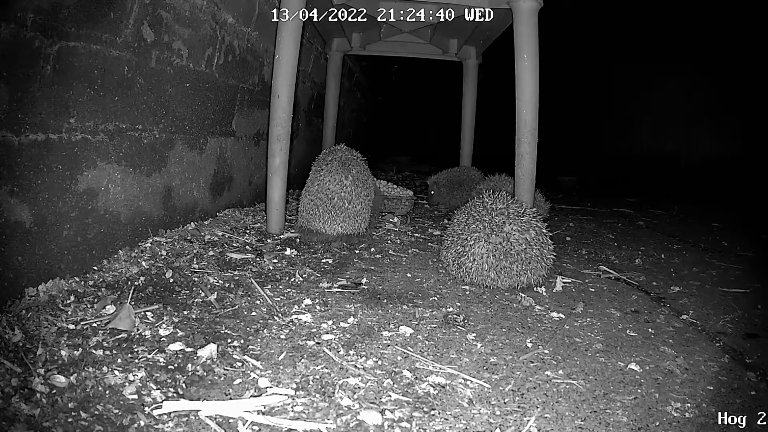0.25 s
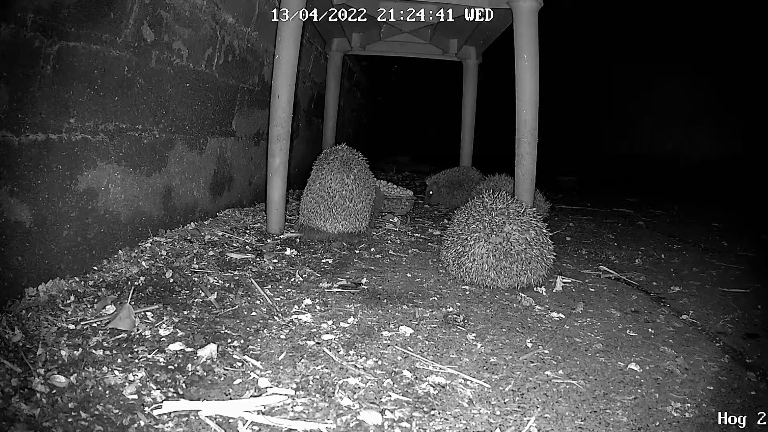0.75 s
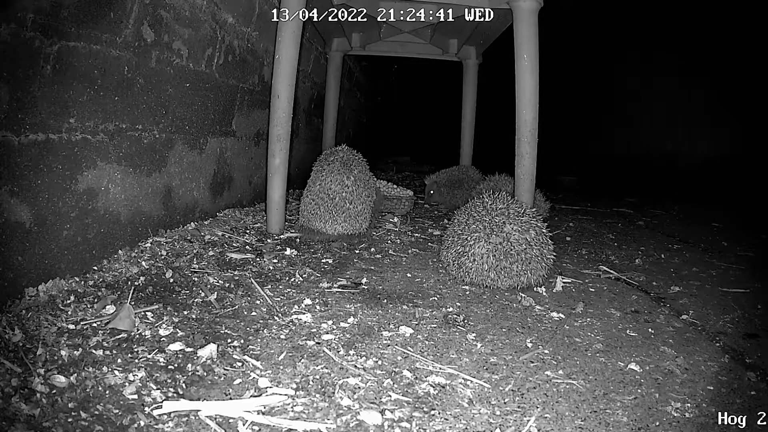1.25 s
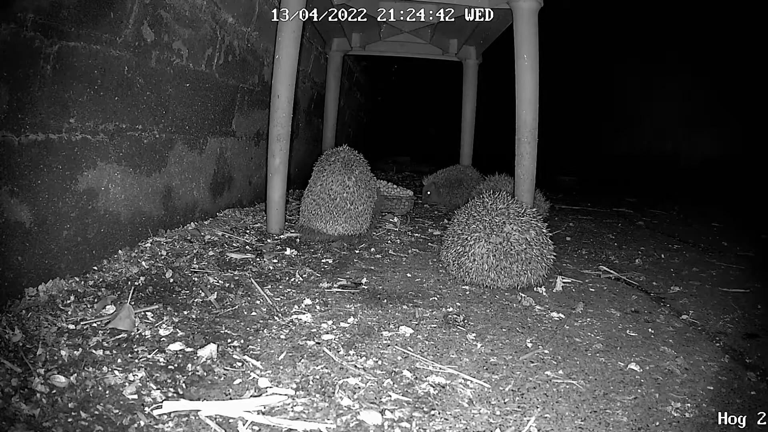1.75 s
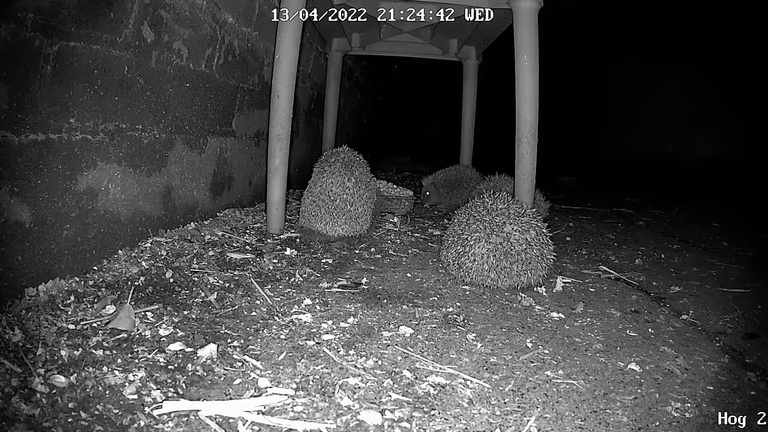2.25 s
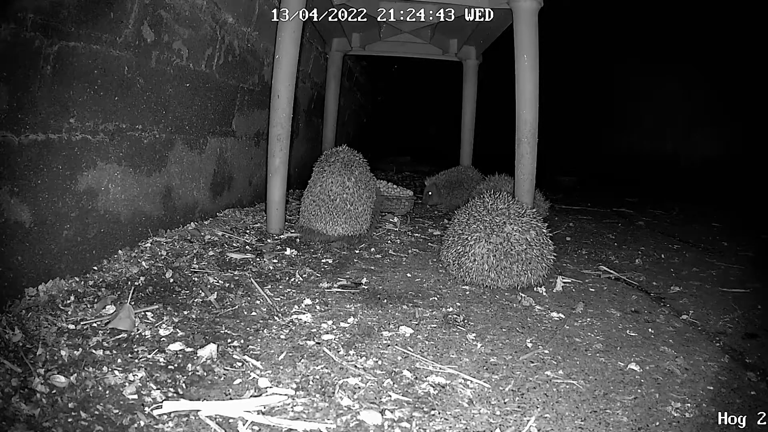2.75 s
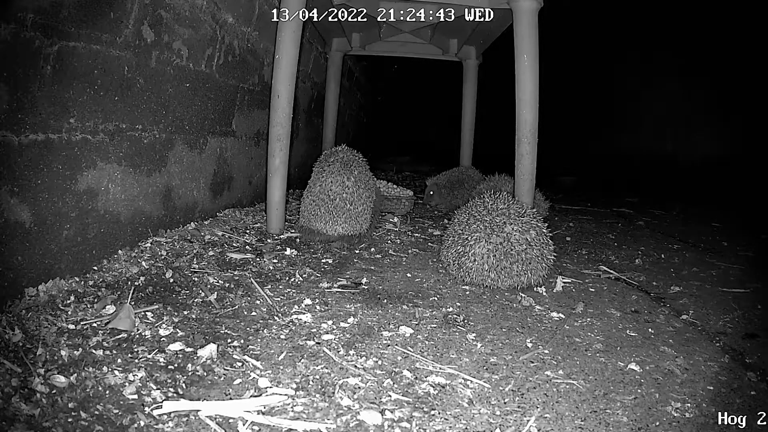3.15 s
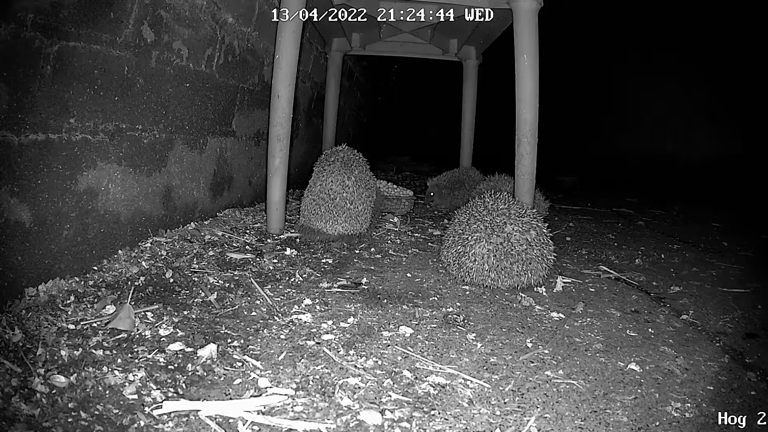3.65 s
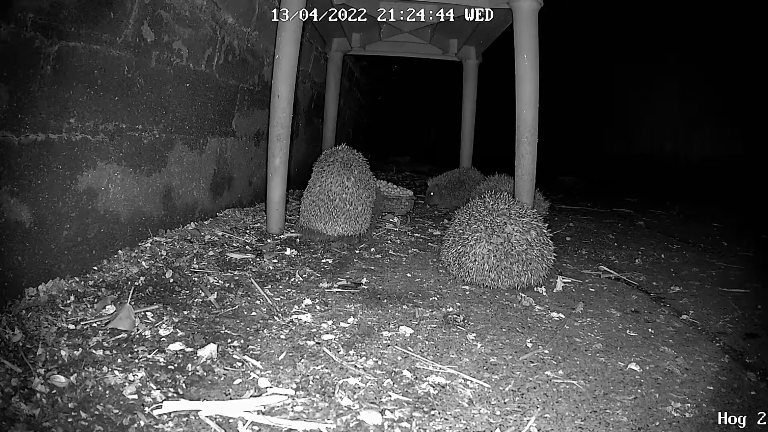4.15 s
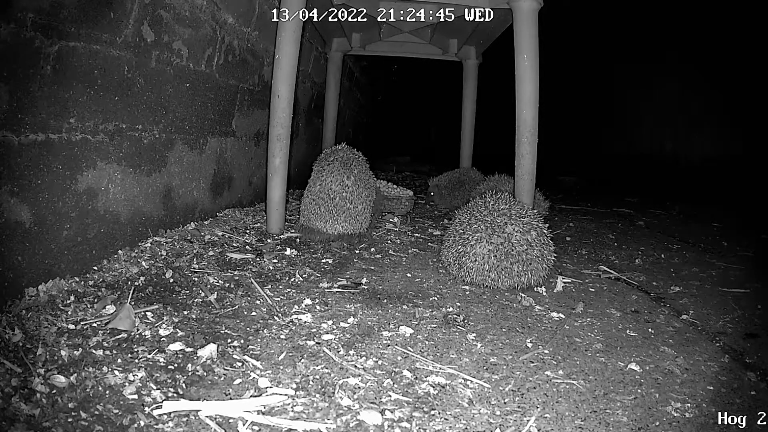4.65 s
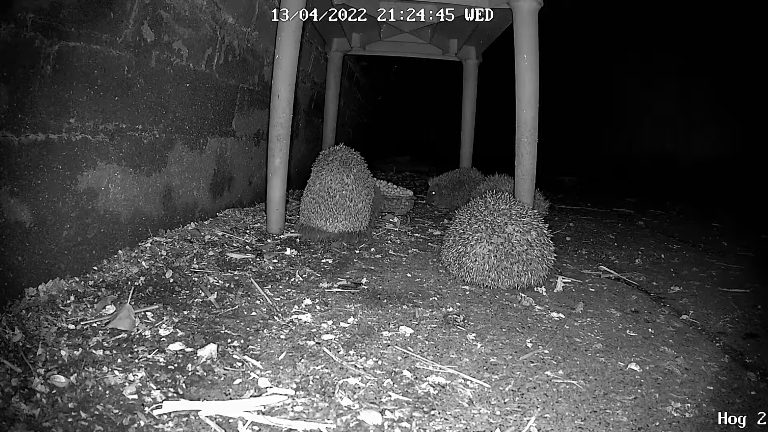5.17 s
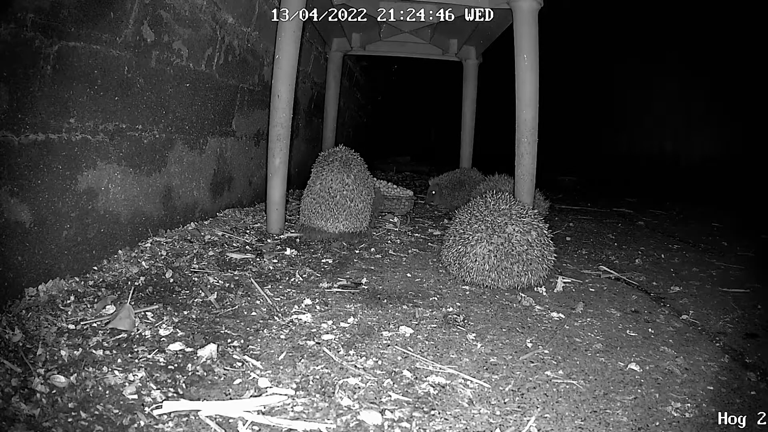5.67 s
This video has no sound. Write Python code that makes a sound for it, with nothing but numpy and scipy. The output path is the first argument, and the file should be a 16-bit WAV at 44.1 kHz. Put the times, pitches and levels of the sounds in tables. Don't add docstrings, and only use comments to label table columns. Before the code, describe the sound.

Irregular hard crunches, crumbly chewing and small dish clinks close to a sheltered feeding spot, with a low unsteady mutter behind.

```python
import sys
import numpy as np
from scipy import signal
from scipy.fft import rfft, irfft, next_fast_len
from scipy.io import wavfile
from scipy.ndimage import uniform_filter1d, minimum_filter1d, map_coordinates

SR = 44100
rng = np.random.default_rng(int(sys.argv[2]) if len(sys.argv) > 2 else 0)


def store_pcm(level_fs):
    pcm = np.round(np.clip(level_fs, -1, 1) * 32767).astype(np.int16)
    wavfile.write(sys.argv[1], SR, np.atleast_2d(pcm).T)


def ratio_of_db(decibels):
    return 10 ** (np.asarray(decibels, float) / 20)


N = 260631
TIME_S = np.arange(N) / SR

# frequency in Hz, level in dB per Hz.
NIGHT_SPECTRUM = [(8.8, -29.5), (15, 0), (63, -3), (114, -9.5), (264, -18), (411, -23.5), (674, -25.5),
                  (748, -27), (830, -23), (2180, -42), (2750, -43.5), (5860, -49), (7600, -46.5),
                  (9880, -88), (16700, -120)]
# start in seconds, end in seconds, share of time high (0-1).
PREAMP_BURSTS = [(0, 1.038, .45), (1.907, 1.915, 1), (1.988, 2.003, 1), (2.005, 3.435, .45),
                 (3.577, 3.716, .4), (3.996, 4.005, 1), (4.009, 4.183, .35), (4.233, 4.237, 1),
                 (4.25, 4.272, .5), (4.294, 4.299, 1), (4.353, 4.362, 1), (4.409, 4.412, 1),
                 (4.49, 4.497, 1), (4.551, 4.554, 1), (4.614, 4.627, 1), (4.683, 4.693, 1),
                 (4.696, 4.702, 1)]
# time in seconds, level in dB.
SHUFFLE_LEVEL = [
    (5.81, -84.5),
    (5.85, -62),
    (5.875, -51),
    (5.91, -61),
]
# frequency in Hz, level in dB per Hz.
LITTER_SPECTRUM = [(240, -54.5), (400, -12), (825, 2), (1680, -5), (2170, -29.5), (2310, -8.5), (5870, -14),
                   (7500, -28), (9750, -76), (16500, -120)]
# time in seconds, pitch in Hz, level in dB.
SQUEAK_PATH = [
    (3.45, 5960, -70.5),
    (3.562, 6000, -71.5),
    (3.574, 6000, -83),
    (3.578, 6000, -96),
    (3.585, 6187, -88),
]
# middle in seconds, half length in seconds, level in dB.
SCRAPES = [
    (1.028, 0.024, -73),
    (1.9, 0.073, -66.5),
    (2.47, 0.046, -70),
    (5.872, .045, -65.5),
]
# middle in seconds, half length in seconds, level in dB.
CHEWS = [(.13, 0.065, -73), (0.24, 0.065, -73.5), (0.433, 0.037, -74), (0.668, 0.034, -75),
         (1.015, 0.023, -65.5), (1.268, 0.02, -69), (1.402, 0.076, -68.5), (1.727, 0.011, -67.5),
         (1.864, 0.029, -74), (1.909, 0.042, -63), (2.098, 0.043, -71), (2.193, 0.04, -62),
         (2.458, 0.029, -62), (2.568, 0.047, -69.5), (2.763, 0.043, -64), (2.802, 0.036, -65),
         (3.045, 0.019, -58.5), (3.104, 0.026, -69.5), (3.37, 0.087, -70), (3.639, 0.063, -70),
         (3.916, 0.041, -71), (4.065, 0.028, -75), (4.167, 0.033, -71.5), (4.257, 0.034, -68.5),
         (4.358, 0.037, -75.5), (4.814, 0.017, -68.5), (5.284, 0.016, -63.5), (5.565, 0.045, -73.5),
         (5.675, 0.013, -63)]
# time in seconds, peak in dB, tilt in dB per body, jaw share in dB.
SPLITS = [(.742, -28.5, 0.5, -9), (0.7514, -30.5, -2.5, -9), (.829, -28, -3, -24), (.8342, -38.5, -1.5, -6),
          (0.8477, -46.5, 1, -4), (0.9933, -42, 1.5, -13), (1.0847, -36.5, -2.5, 2), (1.1596, -25.5, 0, -9),
          (1.166, -22, 4, -31), (1.3567, -40, -0.5, -5), (1.3812, -36, 4, -1.5), (1.4118, -42.5, 4.5, -4.5),
          (1.5695, -18, 0, -15), (1.5765, -26.5, -0.5, 0), (1.7749, -33, 0.5, 2), (1.781, -34, 2, -8),
          (1.8418, -36, 1, -10), (1.9043, -37.5, 3.5, -3), (2.1013, -43.5, -4, -1),
          (2.183, -35, -1.5, -9.5), (2.5279, -32.5, -3.5, 7), (2.555, -43, -1.5, -4), (3.046, -43, -5.5, 6),
          (5.7424, -26, 3.5, -12.5), (5.8707, -25, 6, -14)]
# time in seconds, peak in dB, tilt in dB per body.
MOLAR_CRACKS = [(.1848, -48, -1), (.2074, -50.5, 7), (.2334, -33, -1.5), (.6475, -49, -4),
                (.6652, -49, 1.5), (1.0069, -35.5, 1), (1.339, -48, 3), (1.3509, -33, 0),
                (1.7222, -48.5, -3), (1.834, -28.5, -1), (2.1275, -40.5, 1), (2.1777, -44, -1),
                (2.4518, -47, -5), (2.456, -48, 0), (2.469, -45, 1), (2.4739, -41.5, -6), (2.4803, -34, -1),
                (2.7565, -46, -1), (2.761, -37, 1), (2.7662, -41, 0), (3.0274, -36.5, 1), (3.0663, -50, -5),
                (3.3311, -38, -3), (3.3507, -45, -4), (3.3726, -42, 5.5), (3.898, -41.5, -5),
                (4.251, -42.5, -3), (5.276, -44, 3), (5.2932, -44, -4), (5.6718, -44.5, -1)]
# time in seconds, peak in dB, tilt in dB per body.
DISH_NUDGES = [(.169, -44, 0.5), (.2598, -49, 4.5), (.4294, -53, -4), (1.925, -37, 5), (2.1501, -34, 2),
               (2.2082, -50, -6), (2.2415, -55, -4), (2.5337, -44, 0), (2.5632, -46.5, -4),
               (2.7995, -48, -1), (2.8505, -44.5, -2.5), (3.4561, -41.5, -5.5), (3.623, -38, 2),
               (3.6275, -33.5, 2), (3.6389, -56, 3), (3.6552, -54, 1), (3.6778, -51, 6), (3.726, -53, -10),
               (3.9224, -33, -2), (3.9348, -41.5, -0.5), (3.9807, -54.5, -7), (4.2718, -47, 1),
               (4.3337, -52, 5), (4.8232, -57, 3), (4.8524, -44, -0.5), (5.2871, -45, 0), (5.503, -52.5, 4),
               (5.532, -58, 4)]
# time in seconds, peak in dB, tilt in dB per body.
TOOTH_CLACKS = [
    (.4575, -50.5, 0),
    (.749, -32.5, 2),
    (1.898, -50, 5),
    (5.7735, -42.5, 1.5),
]
SPLIT_SHARE_DB = (-8, -7.5, -7)
# centre in Hz, width in Hz, level in dB.
SNAP_BANDS = [(1700, 2100, 0), (2950, 1500, 1), (4450, 1500, 1), (6100, 2200, -1)]
# centre in Hz, width in Hz, level in dB.
DISH_MODES = [(830, 250, -5), (1150, 250, -4), (1600, 300, -5), (1900, 350, 0), (2300, 300, 0)]
# centre in Hz, width in Hz, level in dB.
RIM_MODES = [(2830, 300, 0), (3230, 250, -4), (3550, 250, -5)]
# centre in Hz, width in Hz, level in dB.
JAW_MODES = [(4200, 350, -2), (4500, 400, 0), (4850, 350, -4)]
# centre in Hz, width in Hz, level in dB.
TOOTH_MODES = [(5680, 450, -1), (6340, 450, 0), (6750, 350, -3)]
# frequency in Hz, t60 in seconds.
SHELTER_T60 = [(800, 0.46), (2600, 0.12), (7000, 0.16)]
# start in seconds, end in seconds, share muted (0-1).
LEAN_STRETCHES = [(.01, 0.063, .4), (0.319, 0.37, .7), (.525, 0.618, .45), (.86, 1.14, .08),
                  (1.996, 2.02, .4), (3.47, 3.596, .25), (3.71, 3.772, 0.35), (4.424, 4.534, .7),
                  (4.61, 4.732, .45), (4.734, 4.78, 0.89), (5.686, 5.739, 1), (5.77, 5.86, .25)]
# frequency in Hz, gain in dB.
CAMERA_BAND = [(8, -22), (20, -2.5), (6600, 0), (7000, -5.5), (7400, -11), (7800, -22), (8200, -50.5),
               (9000, -80)]


def unit(x):
    return x / np.sqrt(np.mean(x ** 2) + 1e-20)


def along(points, hz):
    f, v = np.transpose(points)
    return np.interp(np.log(hz + 1), np.log(f + 1), v)


def curves(rows):
    s, *cols = np.transpose(rows)
    return [np.interp(TIME_S, s, c) for c in cols]


def swells(rows):
    return sum(ratio_of_db(db) * np.exp(-((TIME_S - s) / half_s) ** 2) for s, half_s, db in rows)


def wobble(rate_hz):
    knots = rng.standard_normal(int(N * rate_hz / SR) + 4)
    return unit(map_coordinates(knots, [np.arange(N) * rate_hz / SR]))


def filtered(x, response):
    m = next_fast_len(N + SR // 2)
    return irfft(rfft(x, m) * response(np.fft.rfftfreq(m, 1 / SR)), m)[..., :N]


def ringing(modes):
    def response(f):
        total = 0
        for k, (centre_hz, width_hz, db) in enumerate(modes):
            damping = 1j * f * width_hz
            total = total + (-1) ** k * ratio_of_db(db) * damping / (centre_hz ** 2 - f * f + damping)
        return total
    return response


def coloured(spectrum):
    return unit(filtered(rng.standard_normal(N), lambda hz: ratio_of_db(along(spectrum, hz))))


def grains(rate_hz, spread_db):
    hit = rng.random(N) < rate_hz / SR
    sizes = ratio_of_db(spread_db * np.minimum(rng.exponential(size=N), 2.5)) * rng.choice([-1, 1], N)
    return unit(hit * sizes) + .5 * rng.standard_normal(N)


def night():
    return ratio_of_db(-54 + 0.16 * wobble(3.6)) * coloured(NIGHT_SPECTRUM)


def preamp_flicker():
    share_high = np.zeros(N)
    for start_s, end_s, high in PREAMP_BURSTS:
        share_high[(TIME_S >= start_s) & (TIME_S < end_s)] = high
    hop_times = np.cumsum(rng.gamma(3, 1 / 3, N // 50)) * SR / 210
    draw = hop_times.searchsorted(np.arange(N))
    state = rng.random(N // 50 + 1)[draw] < share_high
    sag_hz, round_hz = 22, 165
    shape = lambda hz: 1j * hz / (sag_hz + 1j * hz) / (1 + 1j * hz / round_hz) ** 2
    return ratio_of_db(-37.0) * filtered(state * 1., shape)


def preamp_busy():
    bridge_s, fade_s = 0.069, .08
    hopping = sum((TIME_S >= start) & (TIME_S < end) for start, end, _ in PREAMP_BURSTS) > 0
    bridged = -minimum_filter1d(-1. * hopping, int(bridge_s * SR))
    return uniform_filter1d(bridged, int(fade_s * SR))


def preamp_fizz():
    rest_db, busy_rise_db = -94, 14
    bands = ringing([(5735, 200, -4.5), (7000, 360, -6.5)])
    sway_db = 2 * wobble(4) + 2.5 * wobble(20)
    level_db = rest_db + busy_rise_db * preamp_busy() + sway_db
    return ratio_of_db(level_db) * unit(filtered(grains(300, spread_db=4.0), bands))


def litter_shuffle():
    return ratio_of_db(curves(SHUFFLE_LEVEL)[0] + 1.7 * wobble(60)) * coloured(LITTER_SPECTRUM)


def tooth_squeak():
    hz, db = curves(SQUEAK_PATH)
    edge_s = np.minimum(TIME_S - SQUEAK_PATH[0][0], SQUEAK_PATH[-1][0] - TIME_S)
    swell = np.clip(edge_s / 0.012, 0, 1)
    whistle = lambda ratio: np.sin(2 * np.pi * np.cumsum(ratio * hz + 50 * wobble(76)) / SR)
    return swell * ratio_of_db(db - 2.5 + 2.5 * wobble(70)) * (whistle(1) + ratio_of_db(3) * whistle(1.15))


def snout_scraping():
    glaze = ringing([(3460, 2000, -3), (5700, 1500, 0), (7600, 1000, 1)])
    roughness = ratio_of_db(2.5 * wobble(70))
    return swells(SCRAPES) * roughness * unit(filtered(grains(900, spread_db=3.5), glaze))


def grinding():
    crumbs = ringing([(3130, 1500, -2.5), (4334, 500, 2.5), (6000, 880, -11)])
    bite = ratio_of_db(2.5 * wobble(50))
    return swells(CHEWS) * bite * unit(filtered(grains(270, spread_db=2.0), crumbs))


def crack_rows():
    molar_db, nudge_db, clack_db = (-22, -12.5, -0.5, -24), (-9, -1, -12.5, -27), (-13.5, -12, -11, -3)
    step = np.arange(4) - 1.5
    rows = [(s, db, np.insert(SPLIT_SHARE_DB, 2, jaw_db) + tilt * step) for s, db, tilt, jaw_db in SPLITS]
    for table, shares_db in ((MOLAR_CRACKS, molar_db), (DISH_NUDGES, nudge_db), (TOOTH_CLACKS, clack_db)):
        rows += [(s, db, shares_db + tilt * step) for s, db, tilt in table]
    tick_first_s, tick_every_s, tick_db, tick_scatter_db = .0296, .1024, -59, 2
    for s in np.arange(tick_first_s, N / SR, tick_every_s):
        rows.append((s, tick_db + tick_scatter_db * rng.standard_normal(), np.array(clack_db)))
    scatter_db = 1.5
    return [(s, db, shares_db + scatter_db * rng.standard_normal(4)) for s, db, shares_db in rows]


def shelter_tail(size):
    hz, t, z = signal.stft(rng.standard_normal(size), SR, nperseg=128)
    decay = ratio_of_db(-60 * t / along(SHELTER_T60, hz)[:, None])
    tail = signal.istft(z * decay, SR, nperseg=128)[1][:size]
    return tail / np.linalg.norm(tail)


def cracks():
    size, lead = SR // 8, SR // 80
    snaps, rings, t = np.zeros((4, N)), np.zeros((4, N + size)), np.arange(size) / SR
    for s, db, shares_db in crack_rows():
        at, gains = round(s * SR), ratio_of_db(db + shares_db)
        ring = ratio_of_db(1.2 - 60 * t / .02) * rng.standard_normal(size) * np.clip(t / .0005, 0, 1)
        ring += ratio_of_db(8) * shelter_tail(size) * np.clip(t / .002, 0, 1)
        snaps[:, at] += gains
        rings[:, at:at + size] += gains[:, None] * ring
        rings[:, at - lead:at] += gains[:, None] * ratio_of_db(-24.5) * rng.standard_normal(lead)
    snaps = ratio_of_db(14) * np.roll(snaps, SR // 2500, axis=1)
    snaps = snaps + .5 * np.roll(snaps, 20, axis=1) + .25 * np.roll(snaps, 47, axis=1)
    total = 0
    bodies = (DISH_MODES, RIM_MODES, JAW_MODES, TOOTH_MODES)
    for snap, ring, broad, modes in zip(snaps, rings, SNAP_BANDS, bodies):
        total = total + filtered(snap, lambda hz: np.abs(ringing([broad])(hz)) ** 2)
        total = total + filtered(ring[:N], ringing(modes))
    return total


def scene():
    background = night() + preamp_flicker() + preamp_fizz() + litter_shuffle()
    eating = tooth_squeak() + snout_scraping() + grinding() + cracks()
    return (background + eating)[None]


def blur(v, tall, long):
    return uniform_filter1d(uniform_filter1d(v, tall, 0), long, 1)


def treble_muting(x):
    hz, t, z = signal.stft(x, SR, nperseg=512, noverlap=384)
    hz = hz[:, None]
    blobs = unit(blur(rng.standard_normal(z.shape[1:]), 4, 6))
    streaks = unit(blur(rng.standard_normal(z.shape[1:]), 3, 30))
    frame_s, frame_first_s, wake_s = .064, .058, .011
    frame = ((t + frame_s - frame_first_s) // frame_s).astype(int)
    bands = rng.random((len(hz), frame[-1] + 1))[(8 * np.log(hz + 1)).astype(int), frame]
    quiet = blur(np.abs(z[0]), 5, 9) < ratio_of_db(-91)
    lean, saving = np.zeros((2, len(t)))
    for start_s, end_s, share_muted in LEAN_STRETCHES:
        lean[(t > start_s) & (t < end_s)] = share_muted
    save_from_db, save_over_db = -38, 20
    for s, db, *_ in SPLITS:
        start_s = s - (s - frame_first_s) % frame_s
        ahead = (t > start_s) & (t < s - wake_s)
        saving = np.maximum(saving, ahead * (max(db - save_from_db, 0) / save_over_db) ** 2)
    treble, below_fizz = hz > 1750, hz < 5550
    lean_share = lean * (below_fizz | (lean > .9))
    share = treble * np.maximum(lean_share, saving * (quiet | (saving > 1)))
    patchy = (share < .35) | (saving > lean)
    rank = np.where(patchy, .5 + .5 * np.tanh(.85 * blobs), bands)
    shaded = (np.abs(hz - 5100) < 150) * (t < PREAMP_BURSTS[3][1])
    thin = (streaks > 1.5 - 1.6 * shaded) & quiet & treble & below_fizz
    muted = (rank < share) | thin
    warble = ratio_of_db(-(2.5 * streaks + 2 * blobs) * quiet * (hz > 1500))
    return signal.istft(z * np.where(muted, .04, warble), SR, nperseg=512, noverlap=384)[1][:, :N]


def top_cut(x):
    return signal.sosfilt(signal.butter(12, 8200, fs=SR, output="sos"), x)


def record(dry):
    mix = filtered(treble_muting(dry), lambda hz: ratio_of_db(along(CAMERA_BAND, hz)))
    return top_cut(mix)


dry = scene()
out = record(dry)
store_pcm(out)
```